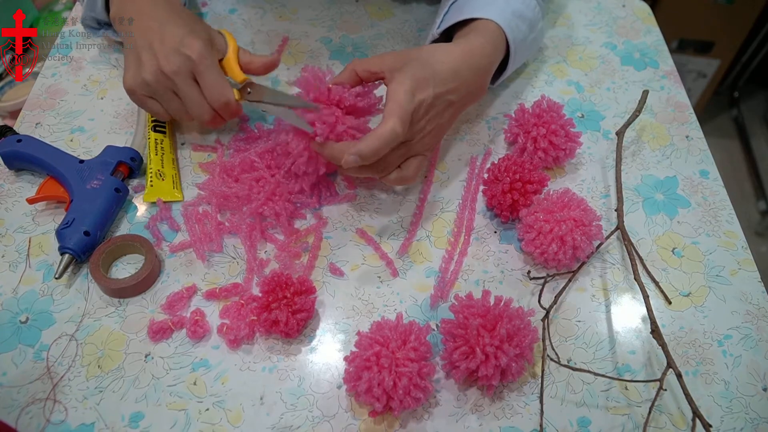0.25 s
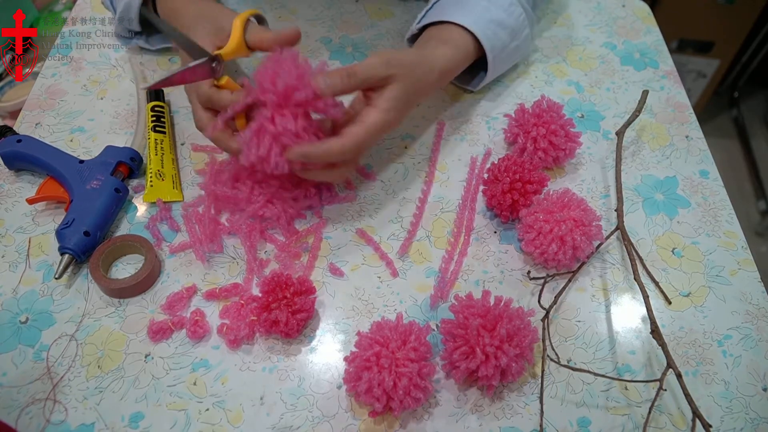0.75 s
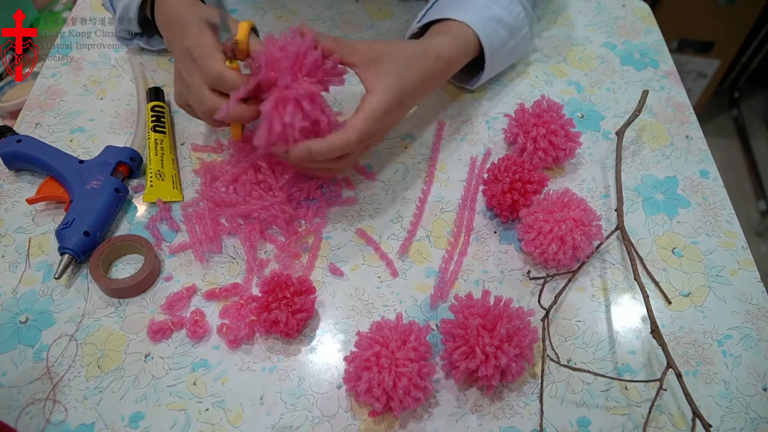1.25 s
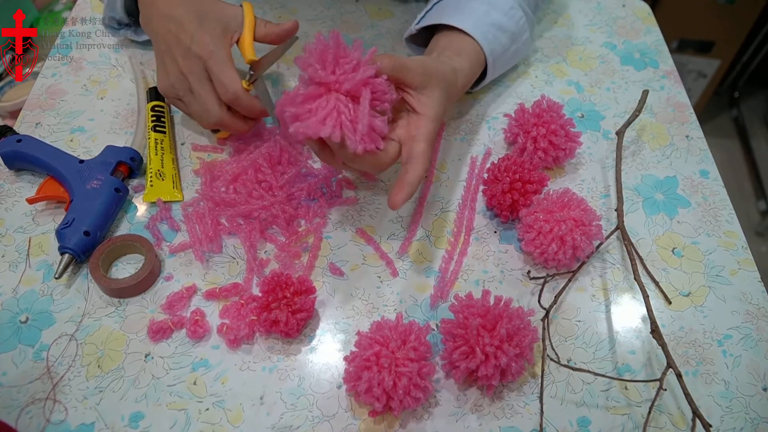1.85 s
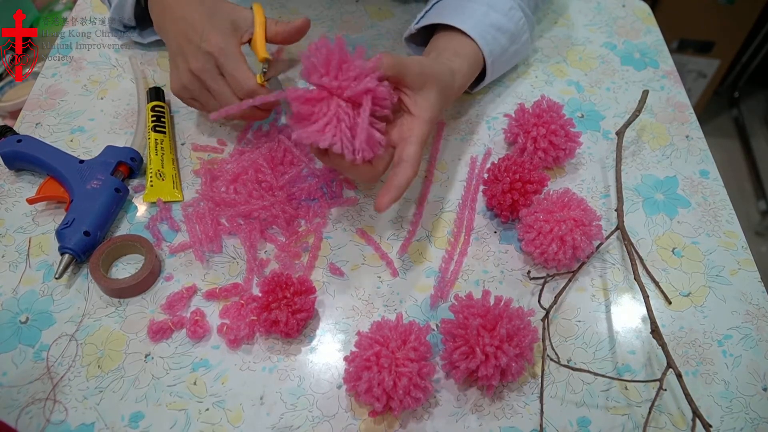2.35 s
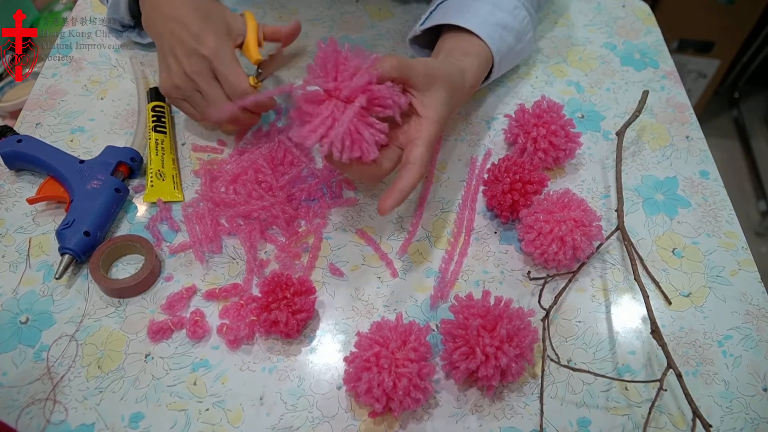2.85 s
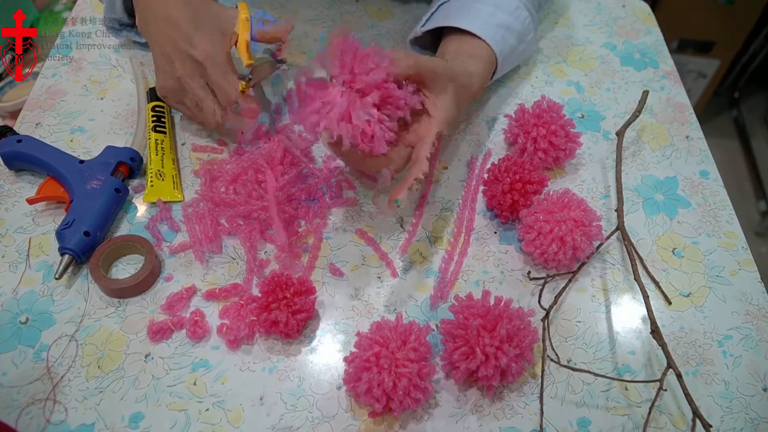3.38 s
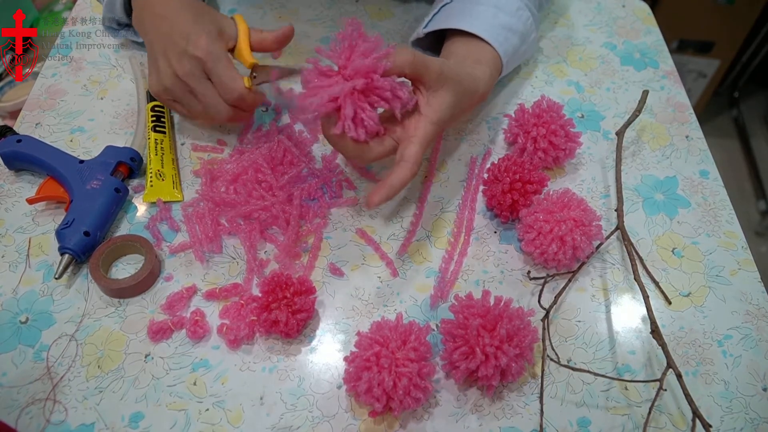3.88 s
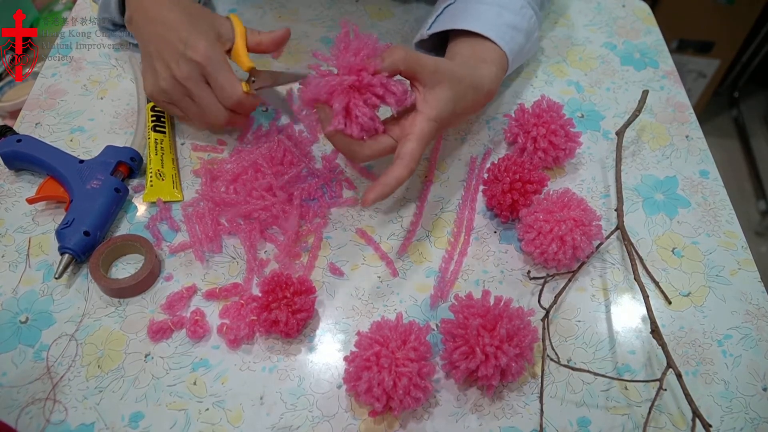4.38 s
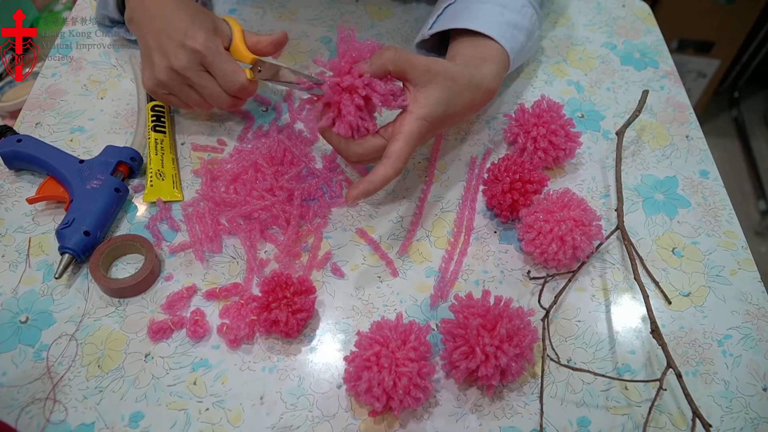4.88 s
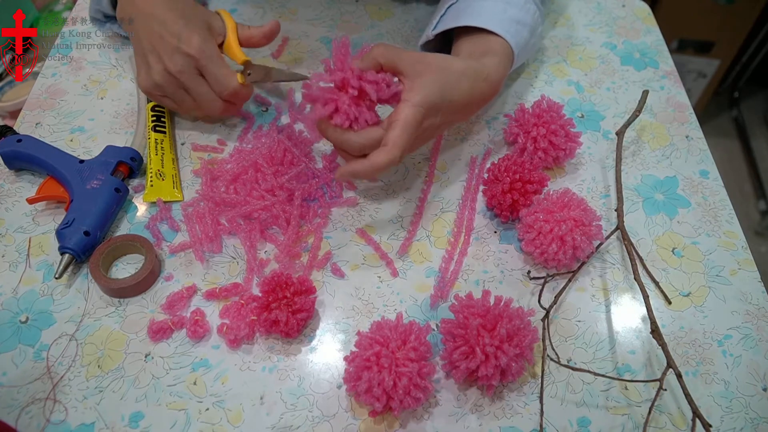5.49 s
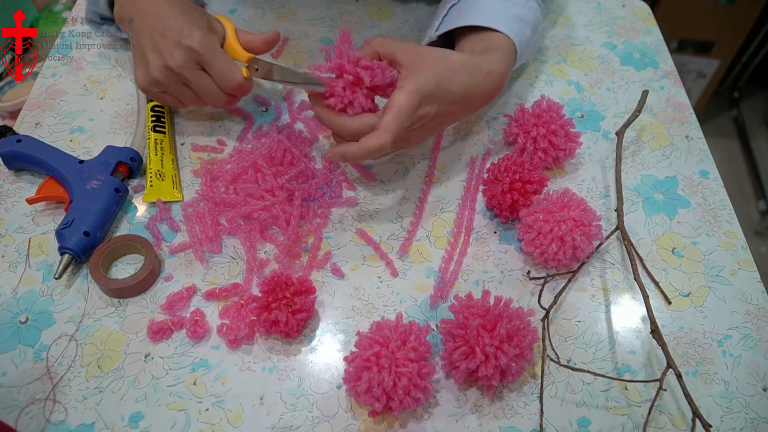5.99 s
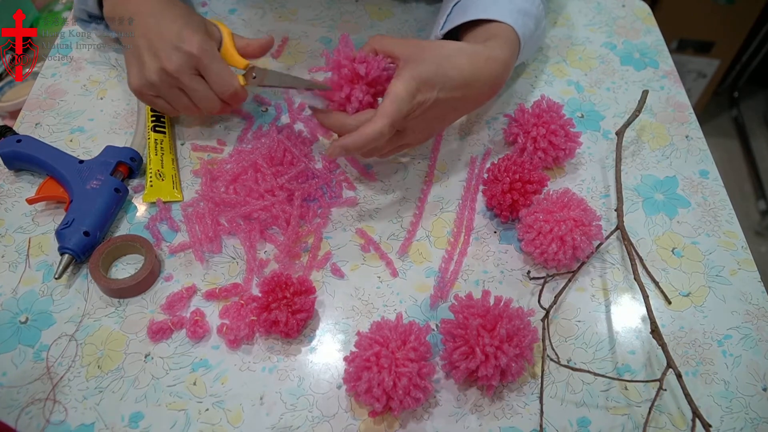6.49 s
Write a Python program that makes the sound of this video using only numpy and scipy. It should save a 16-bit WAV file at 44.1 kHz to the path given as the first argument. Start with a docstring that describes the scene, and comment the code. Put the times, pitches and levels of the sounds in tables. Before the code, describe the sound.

Close metallic scissor clicks and crisp yarn cuts over a low fan-like hum, with a few room knocks and a brief total silence late on.

```python
"""A craft table in a room where a fan or appliance hums, heard in stereo as by two close microphones.
Near: small scissors trim a yarn pompom; bursts of fibre snaps make the crunch, single clicks the blade ticks.
Between cuts the fingers turn the wool: soft hiss with crackles, swelling with each stroke.
Further off: a few hard knocks, resonances struck and heard with much of the room; behind all, air and tones.
Midway the sound drops out for half a second."""
import sys
import numpy as np
from scipy import signal
from scipy.fft import rfft, irfft
from scipy.io import wavfile
from scipy.ndimage import uniform_filter1d

SR = 44100
rng = np.random.default_rng(int(sys.argv[2]) if len(sys.argv) > 2 else 0)


def wav_out(sig):
    """Save sig, one row per channel (or a flat mono array), as 16-bit PCM at SR to the path in sys.argv[1]."""
    wavfile.write(sys.argv[1], SR, np.round(np.clip(np.atleast_2d(sig).T, -1, 1) * 32767).astype(np.int16))


N = 297234
TIME = np.arange(N) / SR
HZ = np.fft.rfftfreq(N, 1 / SR)
CLICK_HZ = abs(np.fft.fftfreq(2048, 1 / SR))

# rush of the machine's air, relative spectrum: [pitch_hz, level_db]
AIR_COLOUR = [(20, -8.5), (50, 0), (160, 3), (300, 0), (390, 0.5), (600, -5), (1100, -2.5), (1600, -6.5),
              (2500, -8), (4000, -15.5), (6500, -28), (10000, -40.5), (16000, -34)]
AIR_DB = -38
# tones of the machine: [pitch_hz, level_db (rms)]
HUM_TONES = [(99, -52), (114, -47.5), (200, -53), (218, -46), (243, -53), (358, -46.5), (400, -47.5),
             (436, -55.5), (495, -58), (540, -57), (714, -58.5), (780, -53), (802, -60), (826, -61.5),
             (992, -49.5), (1020, -52.5), (1165, -55), (1197, -56), (1284, -69), (1435, -57.5),
             (1684, -51.5), (2320, -55.5), (2606, -66), (2887, -70.5)]
# likeness of the left and right microphones: [pitch_hz, likeness (1 = identical)]
LIKENESS = [(60, 0.99), (130, 1), (290, 0.99), (640, 0.87), (1410, 0.75), (3100, 0.61), (6820, 0.4),
            (15000, 0.61)]
# lean of the noise to the left: [pitch_hz, left_over_right_db]
LEFT_LEAN = [(80, .1), (250, .6), (500, 1.3), (1000, 1), (4000, .6), (15000, 0)]
# dying away of the room: [pitch_hz, t60_s]
ROOM_DECAY = [(200, 0.19), (500, 0.16), (1000, .27), (3000, .28), (8000, 0.14), (15000, 0.036)]
# nominal early returns from table top and hands: [delay_s, gain]
TABLE_ECHOES = [(.0004, .17), (.00078, .27), (.00112, .25), (.0016, .2), (.0025, .16)]
# hard knocks across the room: [start_s, relative level_db, thud_db (bass against the clack),
# dull_hz (duller above this), pitch (factor on the resonances)]
KNOCKS = [(0.0454, -17, -5, 3500, 0.82), (1.7632, -5, 7.5, 3150, 1.03), (3.157, -21, -12, 3500, 1.1),
          (3.4179, 0.5, -0.5, 7500, 1.03), (3.9792, -10, 0.5, 3600, .98), (4.24, -9.5, 0, 5000, 1.06),
          (5.537, 2.1, 3, 12000, 0.933)]
# broad resonances of the knocked thing: [pitch_hz, half_width_hz (6 dB down), relative level_db]
KNOCK_RESONANCES = [(307, 69, 2.5), (520, 93, 0), (1040, 170, -13), (1790, 150, -9), (2330, 250, -4),
                    (2796, 200, -0.5), (3390, 480, -12), (4730, 290, -11), (5700, 500, -18.5),
                    (7400, 290, -18)]
# colour of sliding wool: [pitch_hz, relative level_db]
WOOL_COLOUR = [(500, -21.5), (2000, -7.5), (4000, -3), (7000, -3.5), (10000, -3), (13000, -6),
               (16000, -10.5)]
# strokes of the fingers turning the pompom: [fastest_s, length_s, relative level_db]
FINGER_STROKES = [(0.04, 0.1, -49.5), (0.24, 0.21, -51), (0.563, 0.37, -52), (0.836, 0.27, -43.5),
                  (1.008, 0.18, -44.5), (1.104, 0.24, -49.5), (1.27, 0.17, -49), (1.42, 0.21, -42.5),
                  (1.607, 0.56, -53), (2.42, 0.73, -50.5), (2.717, 0.44, -55.5), (3.053, 0.14, -55),
                  (3.14, 0.055, -51), (3.348, 0.16, -51), (3.439, 0.074, -49), (3.652, 0.16, -49),
                  (3.87, 0.2, -52), (4.353, .12, -57.5), (5.061, 0.1, -52), (5.49, 0.19, -54.5),
                  (6.038, 0.14, -58.5), (6.44, 0.44, -53.5), (6.708, 0.027, -56.5)]
STROKE_RISE_SHARE = 0.52  # share of a stroke spent speeding up
STROKE_SHAPE = 2.8  # exponent: 2 = bell-shaped, more = flat-topped
HOLDING_DB = -63  # wool merely held in the hand, on the scale of the strokes
# cut wool springing back after each snip: [start_s, relative level_db]
SPRING_BACKS = [(.27, -38), (.31, -41), (2.515, -46), (2.8, -48), (3.703, -40.5), (4.185, -44), (4.24, -47),
                (5.285, -43), (5.322, -47), (5.85, -45.5), (6.32, -45)]
SPRING_RISE_S, SPRING_FALL_S = 0.0052, 0.052
# strands of yarn parting between the blades: [start_s, relative level_db, length_s, tilt_db_per_octave]
STRAND_CUTS = [(.283, -22, 0.019, 1), (0.31, -13, 0.019, 1.5), (2.801, -21, 0.0038, -0.5),
               (3.715, -13, 0.0086, 3.5), (4.177, -14, 0.013, 0.5), (4.205, -17, 0.012, 1),
               (4.2315, -16.5, .008, -1), (5.282, -13, 0.012, -3), (5.293, -19, 0.0087, -6),
               (5.821, -22.5, 0.006, -3.5), (5.844, -14.5, 0.012, -2), (5.873, -21, 0.0051, 3),
               (6.314, -13.5, 0.013, -3.5), (6.501, -18.5, 0.019, 4)]
# soft onset: hiss rises just before each cut; rise time, level against the listed cut
ONSET_S, ONSET_DB = 0.0116, -32
# colour of steel biting wool: [pitch_hz, relative level_db]
BITE_COLOUR = [(200, -36), (900, -11), (2000, -2), (4500, -4.5), (7000, -3), (10000, -2), (13000, -4.5),
               (16000, -7)]
# blades catching and letting go: [start_s (before the common delay), relative level_db, tilt_db_per_octave]
BLADE_TICKS = [(0.2292, -19, -1), (0.2453, -15.5, 2), (.2708, -7, 0.5), (.3087, -5.5, 0), (0.33, -10, -5),
               (.5109, -18.5, -4), (0.597, -17, 0.5), (.6569, -23, 0), (1.065, -16.5, -3), (1.309, -21, 3),
               (1.7384, -24, -2.5), (1.9442, -18.5, -4), (2.326, -16, 5), (2.3748, -23, 5),
               (2.5139, -5.5, 3.5), (2.519, -14, 1.5), (2.6025, -18.5, -2), (2.7995, -14, -4),
               (3.1215, -17.5, -0.5), (3.156, -14.5, -5.5), (3.7014, -6, 0), (3.91, -19, 0),
               (3.9534, -22, 0), (4.1888, -10.5, -3.5), (4.2395, -5.5, -2.5), (5.0838, -26, 7),
               (5.2639, -24, 5), (5.313, -21, -4), (5.3203, -0.5, 2.5), (5.4652, -20.5, -4.5),
               (5.873, -12.5, 0), (6.1105, -27, 3), (6.28, -19, -1), (6.319, -12.5, -1)]
# the blades judder once as they start to close, each slip coming after a longer gap
JUDDER_START_S, JUDDER_GAP_S = .1243, .01
JUDDER_SLOWING, JUDDER_COUNT = 1.285, 6  # factor from gap to gap, number of slips
JUDDER_DB, JUDDER_SWELL_DB = -20, 7
# span of the dropout: [start_s, end_s]
DROPOUT = (4.4642, 5.0195)
EDGE_HZ = 16250  # upper band limit


def gain_of(db):
    """Decibels to amplitude."""
    return 10 ** (np.asarray(db) / 20)


def evened(x):
    """Scales to an rms of one."""
    return x / np.sqrt(np.mean(x ** 2) + 1e-20)


def read(points, hz):
    """Reads a (Hz, value) table on a log-frequency axis."""
    f, value = np.transpose(points)
    return np.interp(np.log(hz + 1), np.log(f + 1), value)


def add(mix, s, sound):
    """Mixes a sound in at time s."""
    part = mix[..., max(round(s * SR), 0):][..., :sound.shape[-1]]
    part += sound[..., :part.shape[-1]]


def noise_pair(magnitude):
    """Noise of the given spectrum at two close microphones: alike in the bass, less so higher up."""
    a, b, c, d = rng.standard_normal((4, len(HZ)))
    same = read(LIKENESS, HZ)
    left = a + 1j * b
    right = same * left + np.sqrt(1 - same ** 2) * (c + 1j * d)
    lean = gain_of(read(LEFT_LEAN, HZ) / 2)
    return evened(irfft(np.array([left * lean, right / lean]) * magnitude, N))


def click(gain):
    """The causal (minimum-phase) click of unit energy, shaped by the gain at each of CLICK_HZ."""
    log_spectrum = np.conj(signal.hilbert(np.log(gain + 1e-5)))
    wave = np.fft.ifft(np.exp(log_spectrum)).real
    return wave / np.linalg.norm(wave)


def tail(alike_hz=1200, thin_hz=500, build_s=0.0045):
    """Diffuse room tail: each band dies at its own speed; the bass is weak and shared by both sides."""
    shape = (2, SR // 3)
    taps = rng.choice([-1., 1.], shape) * (rng.random(shape) < .2)
    hz, t, (mid, side) = signal.stft(taps, SR, nperseg=256)
    hz = hz[:, None]
    side = side * hz / np.hypot(hz, alike_hz)
    sides = np.array([mid + side, mid - side])
    decay = gain_of(-60 * t / read(ROOM_DECAY, hz))
    thinning = hz / np.hypot(hz, thin_hz)
    wave = signal.istft(sides * decay * thinning, SR, nperseg=256)[1]
    wave = wave * (1 - np.exp(-(TIME[:wave.shape[1]] / build_s) ** 2))
    return wave / np.linalg.norm(wave[0])


def room(sound, room_db, scatter_db, scatter_s, alike_hz=1000):
    """Direct sound, table echoes, scatter from the clutter and the tail; paths are redrawn on each call."""
    paths = gain_of(room_db) * tail()
    t = TIME[:paths.shape[1]]
    high_pass = signal.butter(1, alike_hz, "high", fs=SR)
    own = signal.lfilter(*high_pass, rng.standard_normal(paths.shape))
    shared = rng.standard_normal(len(t))
    scatter = (own + shared) * np.exp(-t / scatter_s)
    paths += gain_of(scatter_db) * scatter / np.linalg.norm(scatter[0])
    paths[:, 0] += 1  # direct sound
    for delay, gain in TABLE_ECHOES:
        paths[:, round(delay * rng.uniform(.8, 1.2) * SR)] += gain
    return signal.fftconvolve(sound[None], paths, axes=1)


def machine(hum_db=0, width_hz=7, widening=0.0068):
    """Rushing air with narrow, wavering tones on top: noise bands that widen with pitch."""
    power = np.zeros(len(HZ))
    for hz, db in HUM_TONES:
        line = 1 / (1 + ((HZ - hz) / (width_hz + widening * hz)) ** 2) ** 2
        power += gain_of(db) ** 2 * line / line.sum()
    tones = gain_of(hum_db) * np.sqrt(power.sum()) * noise_pair(np.sqrt(power))
    air = gain_of(AIR_DB) * noise_pair(gain_of(read(AIR_COLOUR, HZ)))
    return tones + air


def knocks(level_db=6, thud_hz=700, contact_db=-26, spread_s=.001, direct_db=-5.0, room_db=-1,
           left_db=0.1, rebound_s=0.0016, rebound_db=-8):
    """A low thud and a hard clack with a broad tick of contact, heard with much of the room."""
    out = np.zeros((2, N))
    # bending waves carry the treble faster than the bass, which draws the attack out
    delay = spread_s * np.sqrt(1000 / (CLICK_HZ[:1025] + 100))
    travel = np.exp(-2j * np.pi * np.cumsum(delay) * CLICK_HZ[1])
    for s, db, thud_db, dull_hz, pitch in KNOCKS:
        modes = np.zeros(len(CLICK_HZ))
        for hz, width, mode_db in KNOCK_RESONANCES:
            modes += gain_of(mode_db) ** 2 / (1 + ((CLICK_HZ - hz * pitch) / width) ** 2) ** 2
        body = np.sqrt(modes + gain_of(contact_db) ** 2)
        # a soft blow stays in contact longer: more thud, less treble
        thud = gain_of(thud_db / (1 + (CLICK_HZ / thud_hz) ** 4))
        blow = thud / np.sqrt(1 + (CLICK_HZ / dull_hz) ** 8)
        knock = gain_of(db + level_db) * irfft(rfft(click(body * blow)) * travel)
        paths = gain_of(room_db) * tail(alike_hz=2000, thin_hz=348, build_s=0.00079)
        paths[:, 0] += gain_of(direct_db)
        # it strikes again at once
        paths[:, round(rebound_s * rng.uniform(.5, 1.3) * SR)] += gain_of(rebound_db)
        add(out, s, signal.fftconvolve(knock[None], paths, axes=1))
    return out * gain_of([[left_db], [-left_db]])


def sliding():
    """Strength of the wool's hiss: finger strokes, a short rise leading into each cut, a release after each snip."""
    power = np.full(N, gain_of(HOLDING_DB) ** 2)
    for s, length, db in FINGER_STROKES:
        share = np.where(TIME < s, STROKE_RISE_SHARE, 1 - STROKE_RISE_SHARE)
        away = abs(TIME - s) / (length * share)
        power += gain_of(db) ** 2 * np.exp(-np.minimum(2 * away, 10) ** STROKE_SHAPE)
    t = TIME[:SR // 2]
    before = t[SR // 10::-1]  # the last tenth of a second, counted down to the cut
    for s, db, _, _ in STRAND_CUTS:
        onset = gain_of(db + ONSET_DB) * np.exp(-before / ONSET_S)
        add(power, s - before[0], onset ** 2)
    for s, db in SPRING_BACKS:
        release = gain_of(db) * np.minimum(t / SPRING_RISE_S, 1) * np.exp(-t / SPRING_FALL_S)
        add(power, s, release ** 2)
    return np.sqrt(power)


def rubbing(level_db=2.17, catches_per_s=130, catch_db=-6, spread_db=3.0, flutter_db=1.9):
    """Countless fibres slide as a soft, uneven hiss; now and then one catches and crackles."""
    colour = gain_of(read(WOOL_COLOUR, HZ))
    catches = (rng.random(N) < catches_per_s / SR) * rng.choice([-1, 1], N)
    catches = catches * gain_of(spread_db * np.minimum(rng.exponential(1, N), 4))
    crackle = irfft(rfft(catches) * colour, N)
    crackle = room(crackle, room_db=-13.5, scatter_db=-5, scatter_s=0.0011)[:, :N]
    wool = noise_pair(colour) + gain_of(catch_db) * evened(crackle)
    flutter = evened(uniform_filter1d(rng.standard_normal(N), size=300))
    return wool * sliding() * gain_of(level_db + flutter_db * flutter)


def snap(tilt_db):
    """One click in the colour of the blades, tilted in dB per octave about 8 kHz, down to 2 kHz."""
    octaves = np.log2(np.maximum(CLICK_HZ, 2000) / 8000)
    return click(gain_of(read(BITE_COLOUR, CLICK_HZ) + tilt_db * octaves))


def cuts(level_db=5, fibres_per_s=7000, spread_db=4):
    """A strand parts as a burst of tiny snaps, one for each fibre."""
    out = np.zeros((2, N))
    for s, db, length, tilt_db in STRAND_CUTS:
        size = round(length * SR)
        sign, strength = rng.standard_normal((2, size))
        snaps = np.sign(sign) * (rng.random(size) < fibres_per_s / SR)
        snaps *= gain_of(spread_db * strength) * np.sqrt(signal.windows.hann(size))
        snaps /= np.linalg.norm(snaps) + 1e-9
        crunch = gain_of(db + level_db) * np.convolve(snaps, snap(tilt_db))
        add(out, s, room(crunch, room_db=-2, scatter_db=-0.5, scatter_s=0.0057))
    return out


def judder():
    """A short run of slips that slows down, swelling and fading: rows like those of BLADE_TICKS."""
    gaps = JUDDER_GAP_S * JUDDER_SLOWING ** np.arange(JUDDER_COUNT)
    since = np.cumsum(gaps) - gaps
    swell = np.sin(np.pi * since / since[-1]) ** 2
    return [(JUDDER_START_S + s, JUDDER_DB + JUDDER_SWELL_DB * arch, 0) for s, arch in zip(since, swell)]


def ticks(level_db=0, delay_s=.001):
    """The blades stick and slip, and click as they pass each other."""
    out = np.zeros((2, N))
    for s, db, tilt_db in judder() + list(BLADE_TICKS):
        tick = gain_of(db + level_db) * snap(tilt_db)
        add(out, s + delay_s, room(tick, room_db=-3, scatter_db=0.0, scatter_s=0.0021))
    return out


def scene():
    """Hum and knocks around, wool and scissors close by."""
    return machine() + knocks() + rubbing() + cuts() + ticks()


def record(dry):
    """A stretch of dead silence, then the band limit."""
    live = (TIME < DROPOUT[0]) | (TIME > DROPOUT[1])
    low_pass = signal.firwin(255, EDGE_HZ, window=("kaiser", 9), fs=SR)
    return signal.oaconvolve(dry * live, low_pass[None], "same", axes=1)


dry = scene()
out = record(dry)
wav_out(out)
```